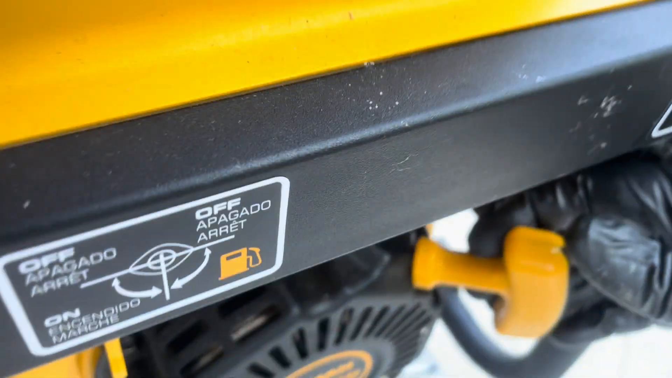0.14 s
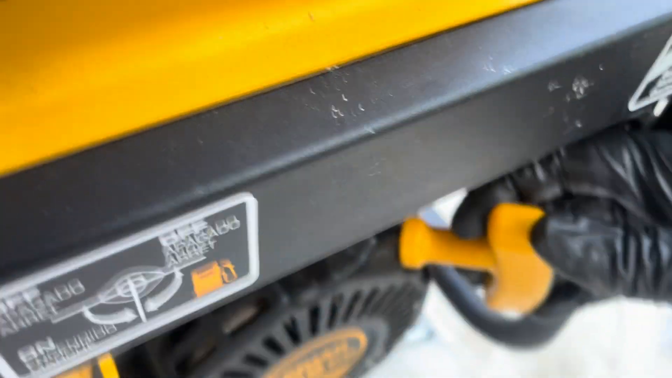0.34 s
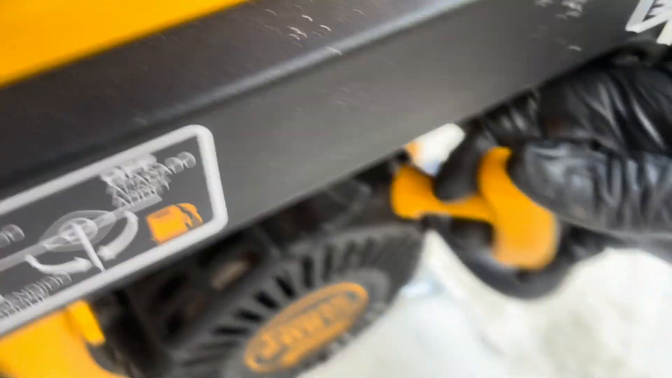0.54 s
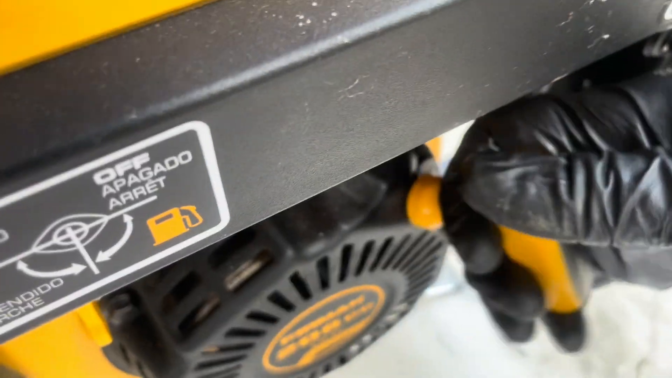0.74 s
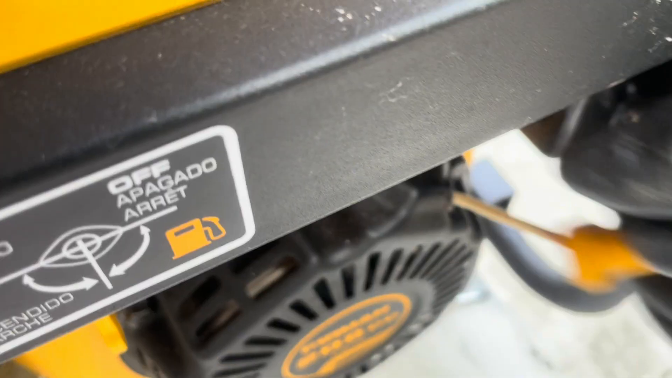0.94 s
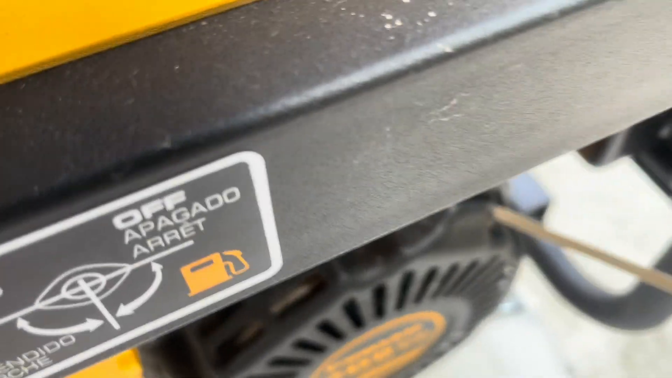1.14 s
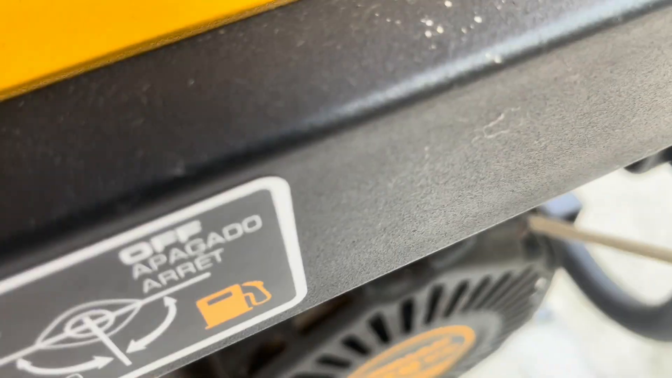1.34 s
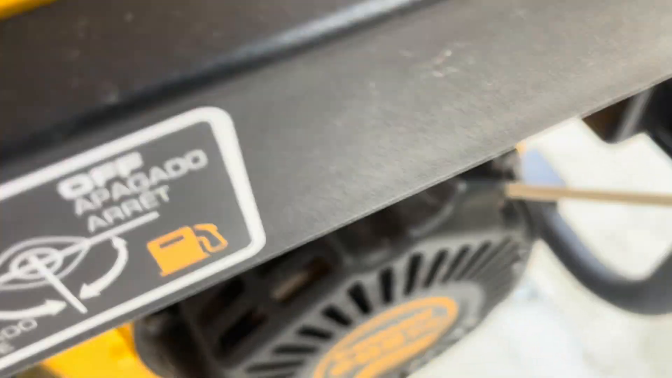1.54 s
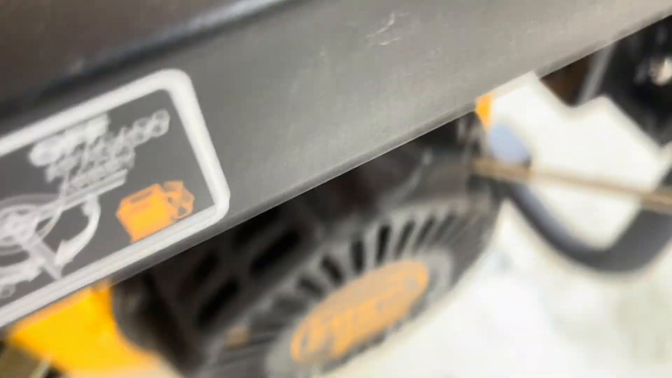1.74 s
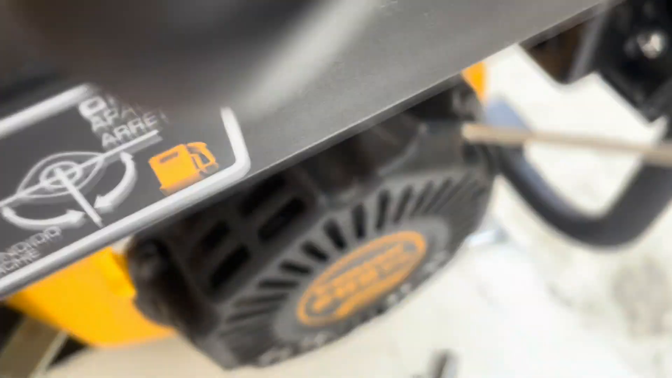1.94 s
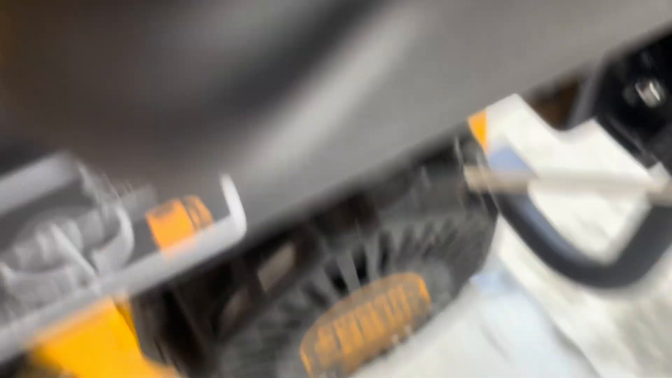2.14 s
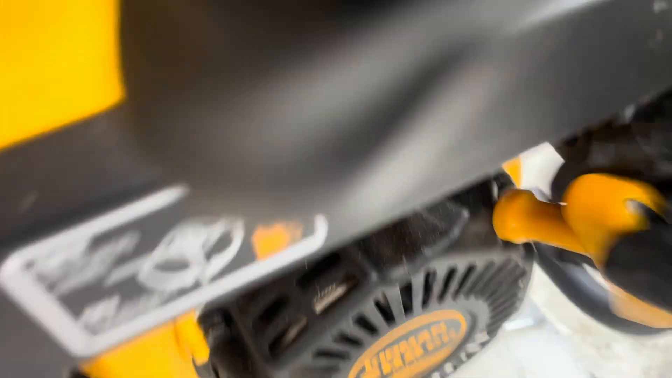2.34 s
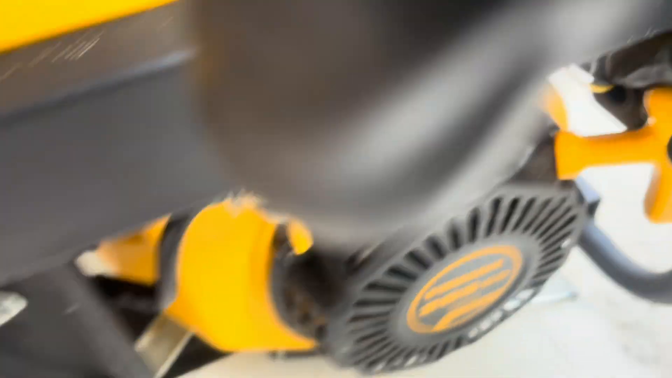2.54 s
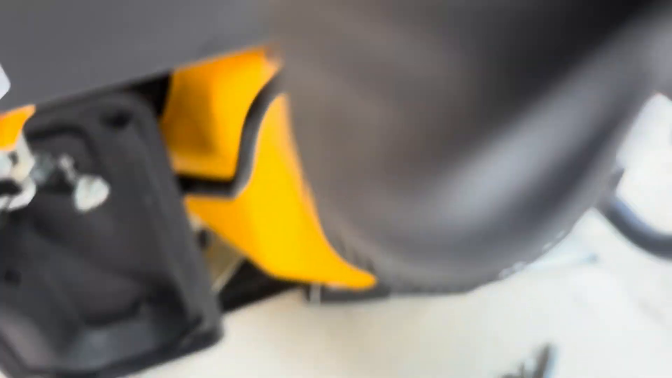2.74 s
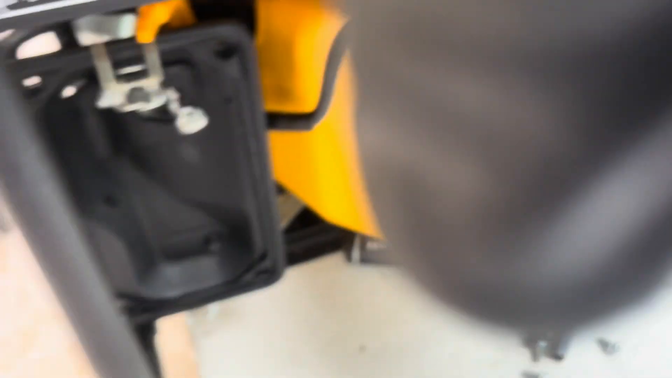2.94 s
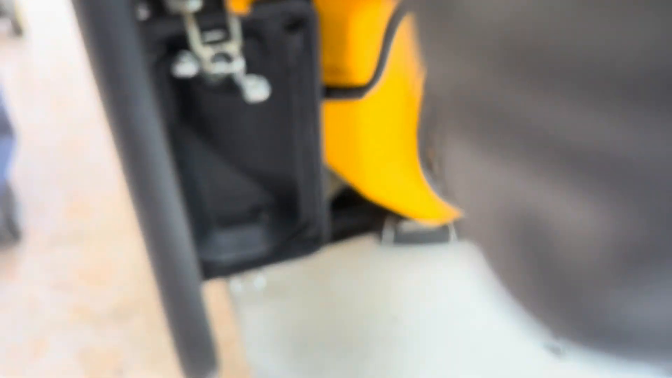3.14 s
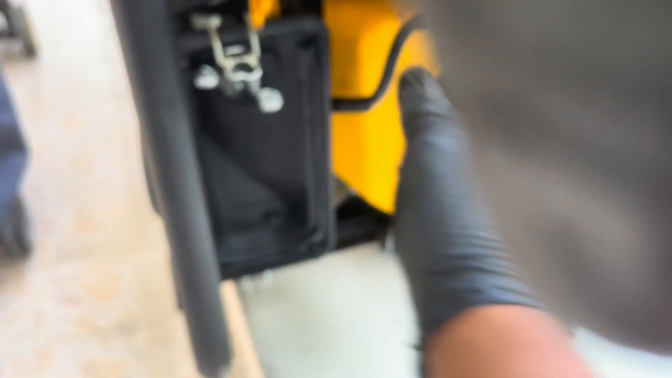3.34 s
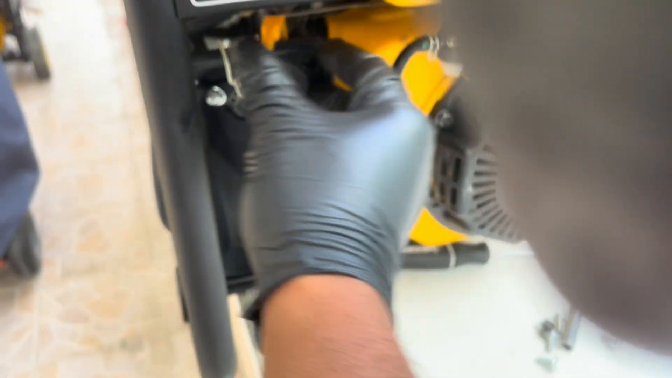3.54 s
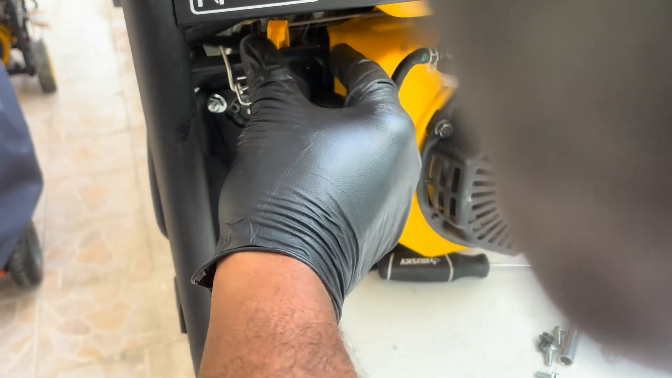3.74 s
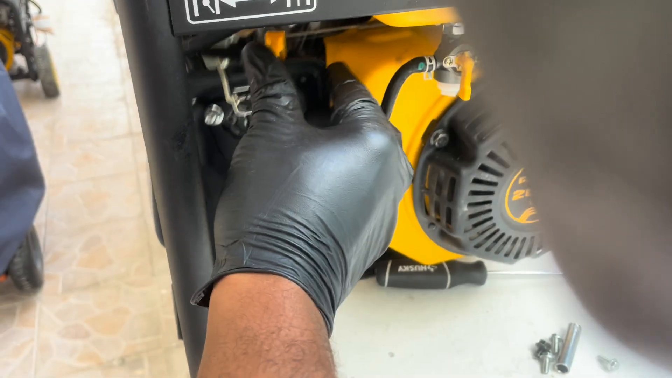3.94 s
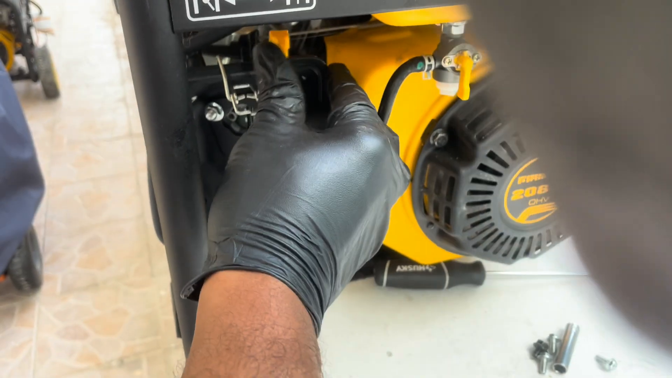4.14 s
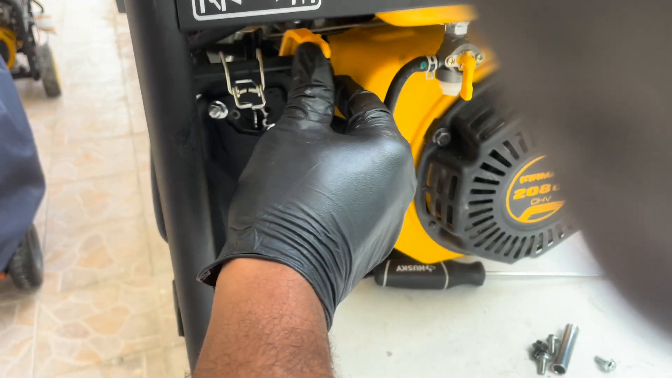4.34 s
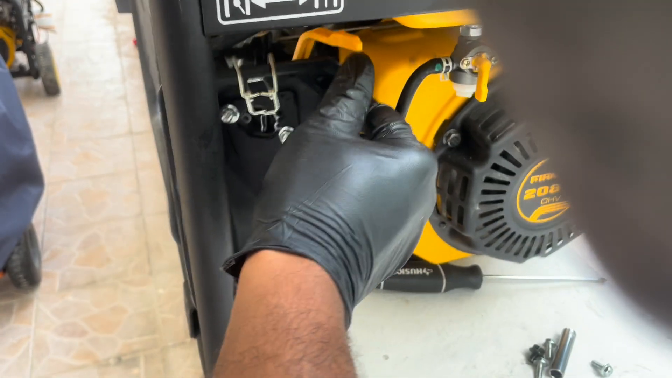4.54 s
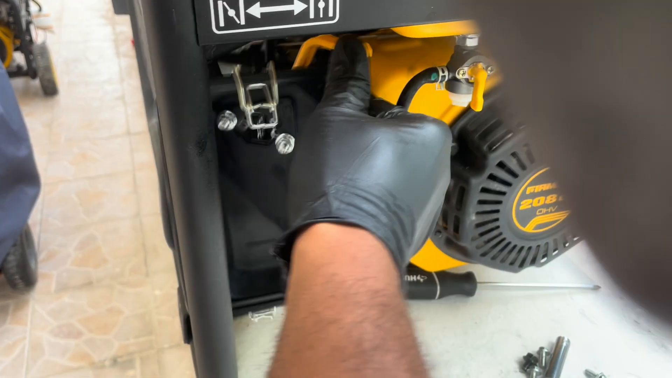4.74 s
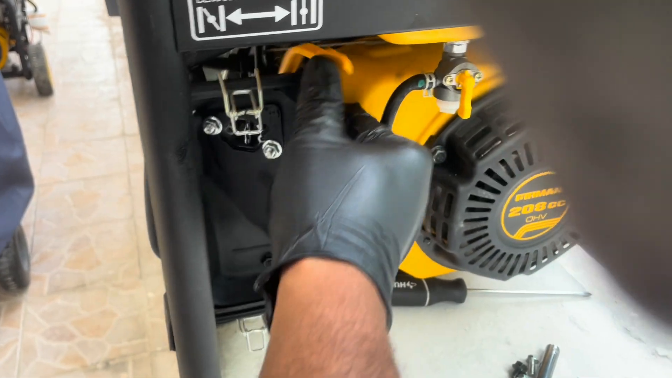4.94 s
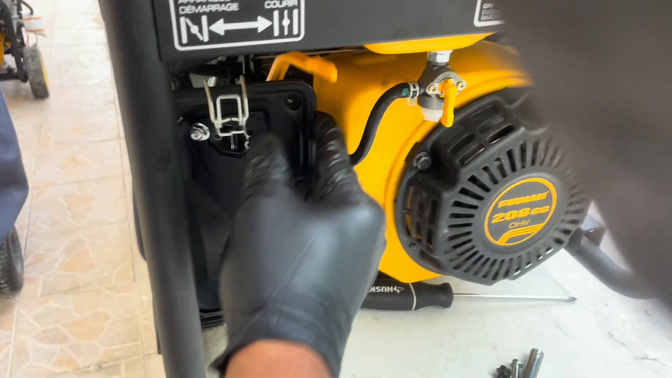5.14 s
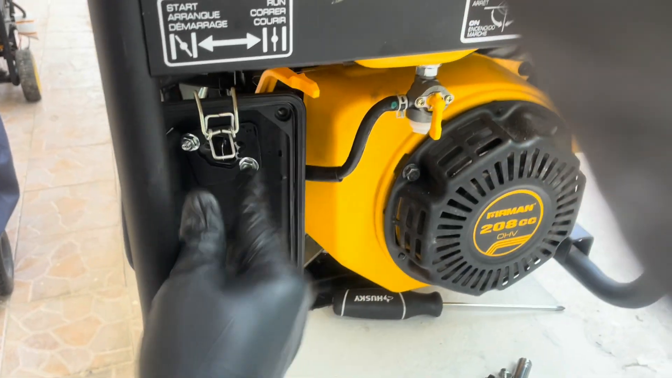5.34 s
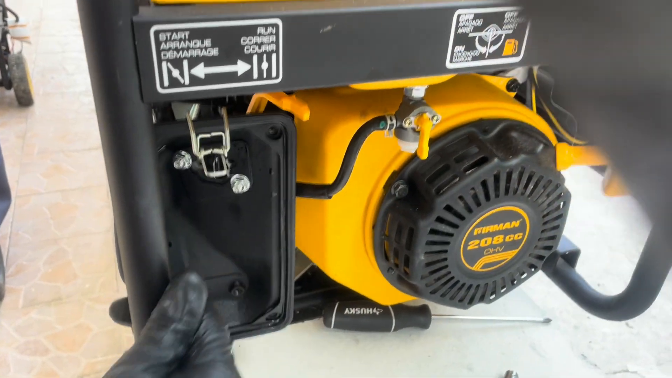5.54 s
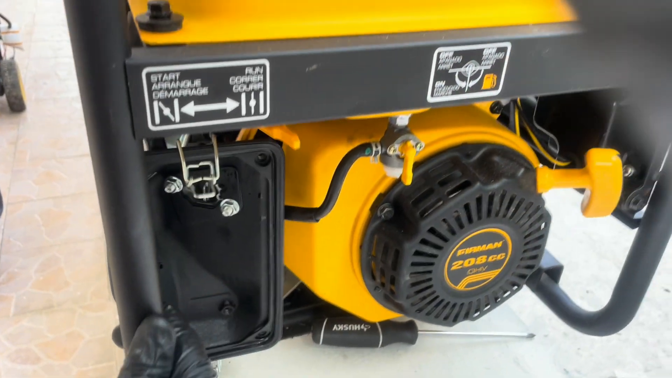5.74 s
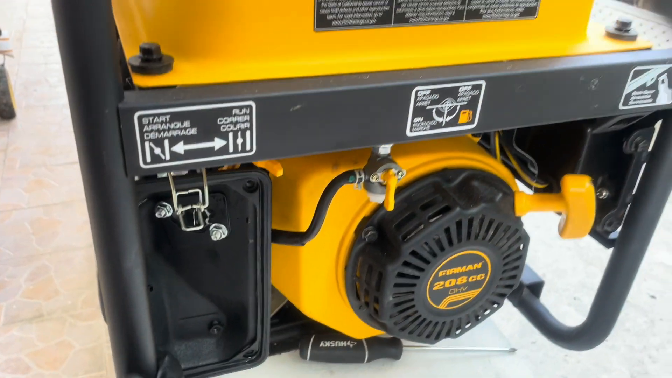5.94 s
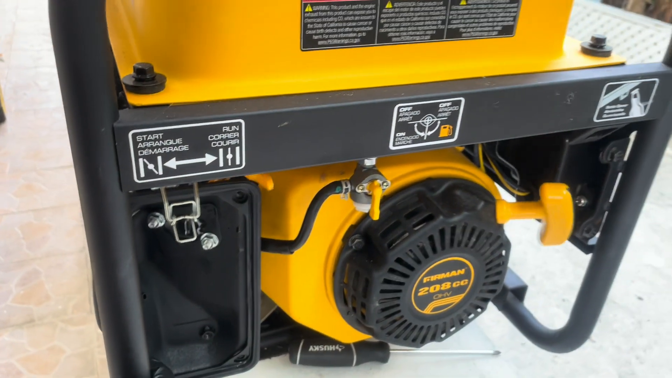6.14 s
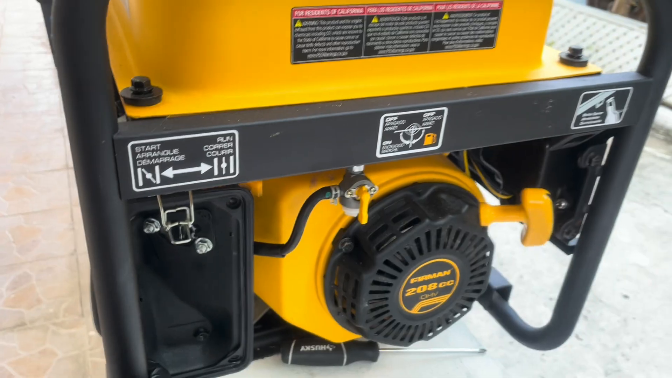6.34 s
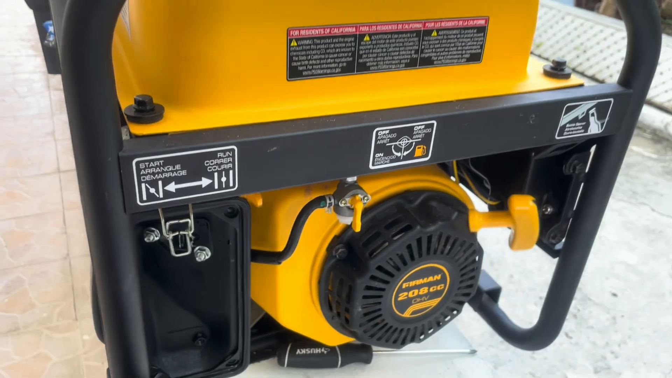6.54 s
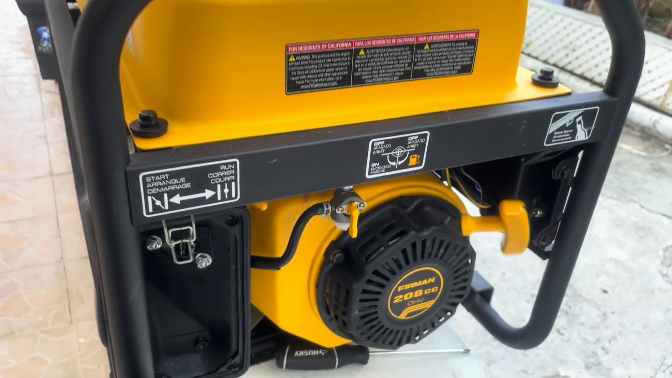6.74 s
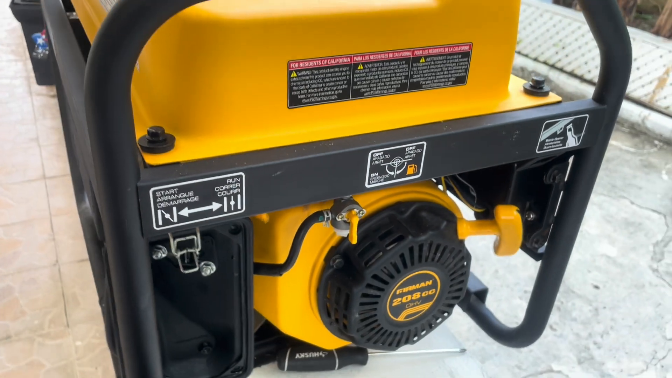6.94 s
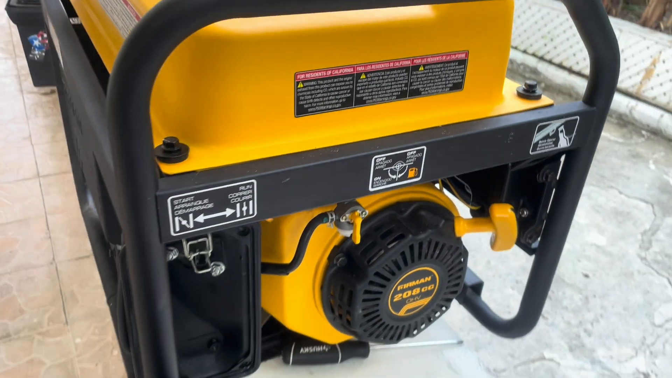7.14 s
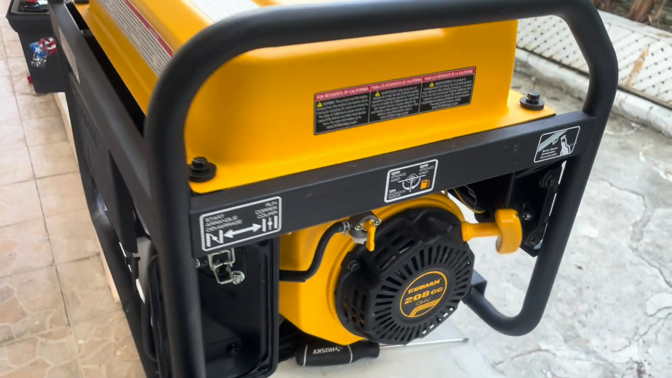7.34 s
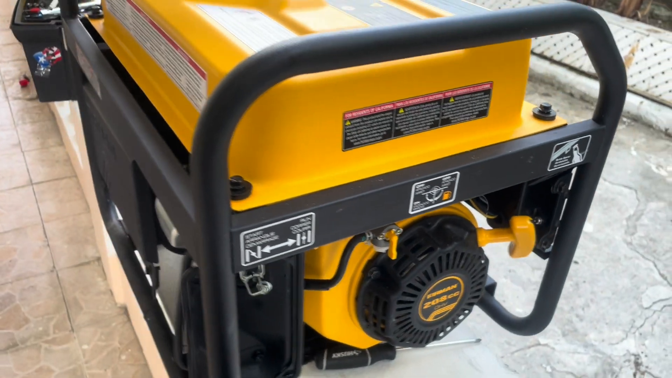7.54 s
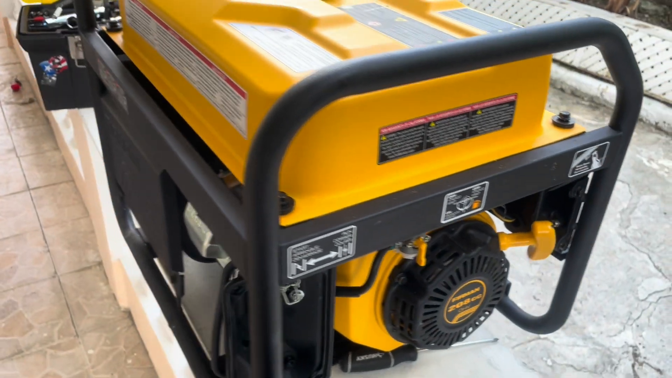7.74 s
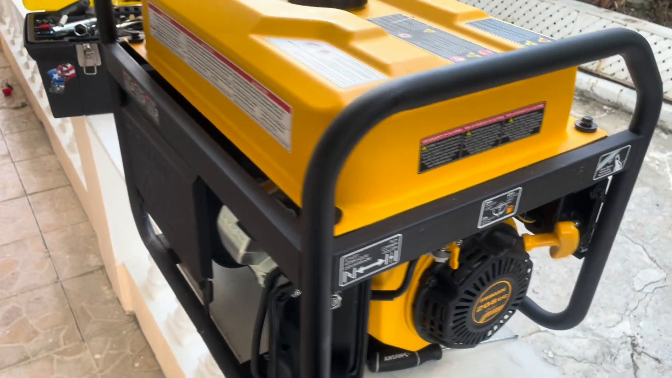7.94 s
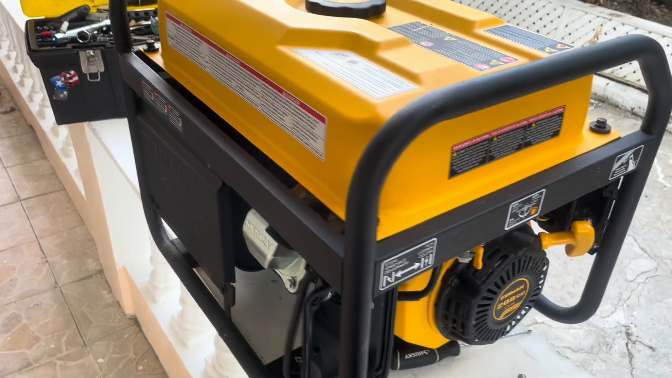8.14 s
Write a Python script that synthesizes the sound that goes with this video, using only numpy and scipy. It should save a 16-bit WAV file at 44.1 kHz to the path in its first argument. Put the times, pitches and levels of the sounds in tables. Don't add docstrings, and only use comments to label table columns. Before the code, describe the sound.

Handling bumps, ratchet clicks and a droning starter-cord pull, then a small generator engine chugs roughly, races up and settles into a steady drone.

```python
import sys
import numpy as np
from scipy import signal
from scipy.fft import rfft, irfft, next_fast_len
from scipy.io import wavfile
from scipy.ndimage import uniform_filter1d

SR = 44100
rng = np.random.default_rng(int(sys.argv[2]) if len(sys.argv) > 2 else 0)


def put_to_file(sound):
    columns = np.atleast_2d(sound).T
    safe = np.clip(columns, -1, 1)
    whole_steps = np.round(safe * 32767)
    wavfile.write(sys.argv[1], SR, whole_steps.astype(np.int16))


def amplitude_ratio(level_db):
    exponent = np.asarray(level_db, float) / 20
    return 10 ** exponent


N = 361179
TIME = np.arange(N) / SR
GOVERNED_S = .03179
GOVERNOR_S, TAKES_S = 4.7, 0.1


def unit(x):
    return x / np.sqrt(np.mean(x ** 2) + 1e-20)


def along(points, hz):
    f, v = np.transpose(points)
    return np.interp(np.log(hz + 1), np.log(f + 1), v)


def curves(rows, at=TIME):
    s, *cols = np.transpose(rows)
    return [np.interp(at, s, c) for c in cols]


def bell(x, centre, spread):
    return np.exp(-.5 * ((x - centre) / spread) ** 2)


def decay(t, db, t60):
    return amplitude_ratio(db - 60 * t / t60)


def strike(out, start_s, sound):
    out[round(start_s * SR):][:len(sound)] += sound


def wobble(rate):
    knots = int(N * rate / SR) + 2
    return np.interp(TIME * rate, np.arange(knots), rng.standard_normal(knots))


def filtered(x, response):
    m = next_fast_len(N + SR // 2)
    return irfft(rfft(x, m) * response(np.fft.rfftfreq(m, 1 / SR)), m)[..., :N]


def white():
    return rng.standard_normal(N)


def noise(spectrum):
    return unit(filtered(white(), lambda hz: amplitude_ratio(along(spectrum, hz))))


def resonant(x, modes):
    def response(f):
        total = 0
        for k, (c, w, db) in enumerate(modes):
            total = total + (-1) ** k * amplitude_ratio(db) * 1j * f * w / (c * c - f * f + 1j * f * w)
        return total
    return filtered(x, response)


def pulses(times, db):
    at = np.clip(np.round(times * SR).astype(int), 0, N - 1)
    return np.bincount(at, amplitude_ratio(db) * (times * SR < N - 1), N)


def held(db, turns):
    return amplitude_ratio(db[turns.astype(int)]) * (turns >= 0)


def governor(at):
    return np.clip((at - GOVERNOR_S) / TAKES_S, 0, 1)


# start_s, elapsed_cycles
CHOKED = [(1.379, 0), (1.636, 1), (1.835, 2), (2.145, 4), (2.412, 6), (2.65, 8), (2.864, 10), (3.066, 12),
          (3.165, 13), (3.272, 14), (3.506, 16), (3.622, 17), (3.747, 18), (3.998, 20), (4.233, 22)]
# start_s, delay_s
HUNT = [
    (4.86, 0),
    (5.06, .004),
    (6.1, .0015),
    (7.2, -.0005),
    (8.19, -.001),
]


def crank():
    first_excess_s, shrink = .0592, .676
    s, count = np.transpose(CHOKED)
    free = np.arange(1, int((N / SR - s[-1]) / GOVERNED_S) + 1)
    excess = first_excess_s * (1 - shrink ** free) / (1 - shrink)
    s = np.r_[s, s[-1] + GOVERNED_S * free + excess]
    count = np.r_[count, count[-1] + free]
    s = s + curves(HUNT, s)[0]
    return np.interp(TIME, s, count, left=-1), lambda turns: np.interp(turns, count, s)


# start_s, air_draw_db, choke_pop_db, open_throttle (0-1)
BREATH = [(1.379, -44.5, -17, 0.26), (1.636, -38.5, 1.5, 0.53), (1.835, -40, -13, 0.44),
          (1.989, -30.5, -0.5, 0.07), (2.145, -27.5, -1.5, 0.17), (2.279, -29, 0.5, 0.17),
          (2.412, -27, -3, 0), (2.65, -24, -3.5, 0.09), (2.864, -23.5, -4, 0), (3.07, -23.5, -6, 0.05),
          (3.272, -28, -9, 0.1), (3.39, -29, -15, 0.11), (3.5, -30.5, -10, 0.02), (3.626, -30, -8.5, 0),
          (3.87, -29.5, -7.5, 0), (4.115, -26.5, -9.5, 0.14), (4.233, -22.5, -6.5, 0.24),
          (4.36, -21, 3, 0.37), (4.51, -20, -25, 0.37), (4.66, -23, -38, 0.75), (4.72, -28, -23, 0.54),
          (4.765, -28.5, -21, 0.97), (4.83, -35.5, -24, 0.47), (5.2, -39, -66, 0.77), (8.19, -72, -38, 0.6)]
# start_s, level_db
AWAY = [
    (4.8, -3),
    (5.5, -2.5),
    (6.5, -3.5),
    (7.2, -4.5),
    (8.19, -5.5),
]


def strengths(cycle, at):
    draw_db, pop_db, throttle = curves(BREATH, at)
    away_db, = curves(AWAY, at)
    draw_db = draw_db + away_db
    misfire = (cycle % 2 == 1) & (cycle > CHOKED[2][1]) & (cycle < CHOKED[-1][1])
    miss_db = -2 * misfire
    thump_db = draw_db + 6.5 + 10 * throttle - 17 * governor(at) + miss_db
    looser_db = -2.5 * (at < CHOKED[-1][0])
    clatter_db = -18.5 + looser_db + 0.43 * (draw_db + 28.5)
    return pop_db + away_db + miss_db, thump_db, draw_db, clatter_db, draw_db - 18


def with_speed(turns):
    tone_db_per_octave, fan_db_per_octave, fan_full_hz = 16, 12, 13.14
    rate = uniform_filter1d(np.gradient(turns.clip(0)) * SR, size=4000) + 1e-3
    away_db, = curves(AWAY)
    rise_db = tone_db_per_octave * np.log2(rate * GOVERNED_S)
    tone_db = -28 + rise_db
    crack_db = 1 + 1.4 * away_db + rise_db - 13 * (1 - governor(TIME))
    crack_db = crack_db + 5 * np.exp(-np.abs(TIME - GOVERNOR_S - TAKES_S) / .35)
    fan_db = -22 + away_db + fan_db_per_octave * np.log2(np.minimum(rate / fan_full_hz, 1))
    fan_db = fan_db - 11.5 * (TIME < CHOKED[-1][0]) * bell(turns % 2, 0.88, 0.13)
    return tone_db, crack_db, fan_db, curves(BREATH)[2]


def engine():
    turns, time_of = crank()
    cycle, share = np.arange(int(turns[-1]) + 1), turns % 1
    pop_db, thump_db, hiss_db, clatter_db, puff_db = strengths(cycle, time_of(cycle))
    tone_db, crack_db, fan_db, throttle = with_speed(turns)
    luck = rng.standard_normal((len(cycle), 8)).T
    shut = time_of(cycle + .31 + 0.0077 * luck[0])
    stroke = np.clip(share / 0.075, 0, 1) * np.clip((.33 - share) / 0.067, 0, 1) + 0.01

    pop = intake_pop(cycle, time_of, shut, pop_db, luck)
    thump = intake_thump(cycle, time_of, shut, thump_db, throttle, luck)
    air = intake_hiss(turns, stroke, hiss_db, puff_db, throttle)
    clatter = valve_clatter(cycle, turns, time_of, clatter_db, throttle, luck)
    rocking = uniform_filter1d(held(thump_db - 11.5, turns), 2000) * noise(RUMBLE)
    firing = -amplitude_ratio(tone_db) * exhaust_tone(turns)
    firing = firing - amplitude_ratio(crack_db) * firing_crack(cycle, time_of, luck)
    firing = firing + amplitude_ratio(fan_db) * cooling_fan(share)
    bark = muffler_bark(cycle, time_of, luck)
    return pop + thump - bark + air + clatter + rocking + (turns >= 2) * firing


# centre_hz, width_hz, level_db
AIR_BOX = [(732, 65, 2), (900, 200, -13)]


def intake_pop(cycle, time_of, shut, pop_db, luck):
    suck = pulses(time_of(cycle), pop_db + 38 + 2.5 * luck[4])
    suck = suck + pulses(shut, pop_db + 27 + 3 * luck[1])
    duct = resonant(suck, [(700, 200, 0.38)])
    return resonant(duct, AIR_BOX)


# frequency_hz, level_db
THUMP = [(30, -34), (60, 0.5), (110, 5), (250, 1), (450, -17), (800, -6), (2000, -61)]
# centre_hz, width_hz, level_db
THROAT = [(66, 30, -18), (163, 80, -2), (325, 100, -2), (525, 22, 5)]


def intake_thump(cycle, time_of, shut, thump_db, throttle, luck):
    push = pulses(time_of(cycle + 0.011), thump_db + 44.5 + 1.64 * luck[2])
    push = push + pulses(shut, thump_db + 46.5 + 2 * luck[3])
    rebound = pulses(time_of(cycle + .46), thump_db + 40 + 2 * luck[1])
    dull = (1 - throttle.clip(0, 1)) * filtered(push, lambda hz: amplitude_ratio(along(THUMP, hz)))
    return dull + amplitude_ratio(4.0) * resonant(throttle * (push + 1.3 * throttle * rebound), THROAT)


# frequency_hz, level_db
INTAKE = [(500, 7.5), (1500, 8), (3000, 0.5), (5000, -6.5), (6500, -3), (8000, 8.5), (10000, 4.5),
          (13000, -3), (16000, 1)]
# centre_hz, width_hz, level_db
GULP = [(1210, 88, 0), (2330, 260, 4.5), (3600, 3500, -8.5)]
# start_s, level_db
PUFFS = [(2.106, -26), (2.239, -43), (2.38, -25.5), (2.5, -33), (2.62, -23), (2.73, -40), (2.843, -24),
         (3.048, -25), (3.484, -26), (3.722, -33), (3.967, -26), (4.204, -25)]


def intake_hiss(turns, stroke, hiss_db, puff_db, throttle):
    rush = held(hiss_db + 6.5, turns) * amplitude_ratio(throttle) * stroke
    late_puff = held(puff_db + 9.0, turns) * bell(turns % 1, 0.86, 0.048)
    blown_back = sum(amplitude_ratio(db) * bell(TIME, s, 0.0056) for s, db in PUFFS)
    hiss = (rush + late_puff + blown_back) * noise(INTAKE)
    gulp = held(hiss_db + 11.5, turns) * throttle * stroke * unit(resonant(white(), GULP))
    return hiss + gulp


# place (share of the cycle), spread (share of the cycle), level_db
VALVES = [
    (.04, 0.058, -3),
    (.29, 0.034, -5.5),
    (.47, 0.065, -6.5),
    (.58, .07, -12),
    (.76, 0.076, -6.5),
]
# centre_hz, width_hz, level_db
CASING = [(560, 400, -4), (950, 153, 1.5), (1431, 93, 2.5), (1560, 120, -4), (5400, 97, -31.5),
          (2122, 92, -3), (2493, 78, -8), (3680, 1040, -18), (4630, 1300, -44)]
# frequency_hz, level_db
SEAT = [(400, -14), (1600, -3), (4000, -4.5), (6500, -4), (9500, 0), (13000, -19), (16000, -16)]


def valve_clatter(cycle, turns, time_of, clatter_db, throttle, luck):
    share, at_cycle = turns % 1, turns.astype(int)
    knocks, ticks = .17 + .5 * throttle, 0
    for k, (c, w, db) in enumerate(VALVES):
        knocks = knocks + amplitude_ratio(db + 3 * luck[3 + k][at_cycle]) * bell(share, c, w)
        ticks = ticks + pulses(time_of(cycle + c + w * luck[7 - k]), db + 23.5 + 4 * luck[k])
    grit = white() * amplitude_ratio(4 * (0.5 - throttle) * wobble(500))
    cover = resonant(knocks * grit * amplitude_ratio(5 * wobble(30)) + ticks, CASING[::2])
    block = resonant(knocks * grit * amplitude_ratio(5 * wobble(30)) - ticks, CASING[1::2])
    level = uniform_filter1d(held(clatter_db, turns), 800)
    clatter = level * unit(cover - block) * (1 - 1.33 * throttle.clip(0, 1))
    lift = np.clip((share - .44) / 0.035, 0, 1) * np.exp(-(share - .44) / 0.037)
    seat = held(clatter_db + 0.5 + 2 * luck[5], turns) * lift
    return clatter + seat * (1 - throttle.clip(0, 1)) * noise(SEAT)


# multiple (of the cycle rate), level_db, change_db_per_s (as the phone moves round)
EXHAUST = [(2, 0, -1), (3, -9, 0), (4, -9, -2), (5, -4, -1.5), (6, -11, -2), (7, -4, -1), (8, -12, -2),
           (9, -6, -1.5), (10, -8, -2), (11, -11, -2), (12, -2.5, -1), (13, -14, -2), (16, -5.5, -5),
           (17, -13, -3), (18, -11, -3.5), (20, -8, -1.5), (23, -6, -2), (25, -8, -2), (27, -9, -2)]


def exhaust_tone(turns):
    tone = 0
    for k, db, slope_db in EXHAUST:
        level_db = db + slope_db * (TIME.clip(GOVERNOR_S) - 6.3) + 3.0 * wobble(5.4)
        phase = k * 2 * np.pi * turns + .35 * k * k + .6 * wobble(11.0)
        tone = tone + amplitude_ratio(level_db) * np.cos(phase)
    return unit(tone)


# centre_hz, width_hz, level_db
HEAD = [(420, 250, -8), (900, 550, 0), (1500, 400, -5), (2400, 800, -10)]


def firing_crack(cycle, time_of, luck):
    blows = pulses(time_of(cycle - .03 + .003 * luck[0]), 22 + 1.5 * luck[7])
    blows = blows + pulses(time_of(cycle + .47), 10 + 3 * luck[6])
    return filtered(resonant(blows, HEAD), lambda hz: 1 / (1 + 1j * hz / 3200) ** 2)


# frequency_hz, level_db
FAN = [(40, -31.5), (100, -28), (350, -5.5), (450, -10), (800, -7.5), (1500, -2.5), (1800, -11),
       (2300, -9.5), (4000, -17), (5200, -20), (5700, -19.5), (6300, -24.5), (7000, -20), (9300, -19),
       (12000, -29.5), (16000, -28.5)]


def cooling_fan(share):
    pulse_db = 1.4 * np.cos(4 * np.pi * (share - .05))
    return noise(FAN) * amplitude_ratio(pulse_db + .5 * wobble(12) + .6 * wobble(400))


# centre_hz, width_hz, level_db
BARK = [(152, 100, 5), (296, 180, 1), (514, 160, -16)]


def muffler_bark(cycle, time_of, luck):
    at = time_of(cycle - .03)
    bark_db = 28 - 20 * (at - GOVERNOR_S) / 0.41 + 0.5 * (-1) ** cycle + 1.3 * luck[7]
    return resonant(pulses(at, bark_db * 1.0) * governor(TIME), BARK)


# start_s, peak_db, panel_hz, t60_s
RATTLES = [(2.029, -16, 1550, 0.051), (2.068, -14.5, 940, 0.028), (2.084, -25, 1380, 0.054),
           (2.174, -18, 1420, 0.062), (2.202, -10, 1393, 0.073), (2.241, -26, 970, 0.043),
           (2.314, -28, 1390, 0.048), (2.346, -7.5, 907, 0.099), (2.357, -9, 872, 0.19),
           (2.442, -15, 1443, 0.1), (2.468, -15, 1420, 0.086), (2.564, -23, 1410, 0.056),
           (2.59, -12, 1470, 0.085), (2.604, -8, 1400, 0.15), (2.702, -9, 1420, 0.063),
           (2.79, -9, 1390, 0.064), (2.81, -16, 1240, 0.07), (2.889, -10, 1270, 0.06),
           (2.912, -10, 960, 0.19), (3.013, -7.5, 950, 0.061), (3.098, -12, 1243, 0.09),
           (3.112, -12, 1400, 0.048), (3.192, -19, 1413, 0.093), (3.215, -12, 1440, 0.076),
           (3.303, -14, 1434, 0.11), (3.325, -15, 1396, 0.07), (3.422, -20, 1380, 0.083),
           (3.442, -15, 1440, 0.048), (3.511, -11.5, 970, 0.31), (3.554, -11, 1380, 0.077),
           (3.66, -15, 1510, 0.076), (3.678, -15, 1420, 0.07), (3.799, -8.5, 1460, 0.071),
           (3.903, -15, 1475, 0.078), (3.933, -15, 1420, 0.083), (4.027, -10, 1390, 0.082),
           (4.047, -11, 1410, 0.09), (4.152, -11.5, 1500, 0.058), (4.175, -10, 1475, 0.08),
           (4.278, -5.5, 1420, 0.056)]
# centre_hz, width_hz, level_db
SHROUD = [(1800, 180, 1), (2260, 97, 2.5), (2560, 200, 4), (3110, 400, 1), (4010, 300, -1), (5070, 210, -3)]


def panels():
    ring, buzz, t = np.zeros(N + SR), np.zeros(N + SR), np.arange(SR // 5) / SR
    for s, db, hz, t60 in RATTLES:
        shape = decay(t, db, np.clip(t60, .02, .25)) * (1 - np.exp(-t / 0.0019))
        wander = .04 * np.cumsum(rng.standard_normal(len(t)))
        strike(ring, s, shape * np.sin(2 * np.pi * hz * t + wander))
        strike(buzz, s, decay(t, db, 0.024) * (1 - np.exp(-t / 0.00063)))
    return amplitude_ratio(-6) * ring[:N] + amplitude_ratio(-9.5) * unit(resonant(white(), SHROUD)) * buzz[:N]


def starter():
    return ratchet() + rope()


# frequency_hz, level_db
TOOTH = [(400, -16), (800, -6), (1600, -18.5), (4000, -10), (6500, -0.5), (9500, 4), (13000, -7.5),
         (16000, -15)]
# centre_hz, width_hz, level_db
TEETH = [(660, 57, 1), (853, 14, -10), (1490, 140, 0), (2340, 240, -7), (3050, 170, -1.5), (3840, 79, 4),
         (4360, 210, 1.5), (5830, 1500, -9)]


def hub():
    return unit(amplitude_ratio(-4) * noise(TOOTH) + amplitude_ratio(-2) * unit(resonant(white(), TEETH)))


# start_s, peak_db, rattle_t60_s, ring_db
RATCHET = [(0.7346, -41, 0.033, -11), (0.892, -21, 0.053, -18), (0.8966, -23, 0.037, -30),
           (0.9356, -15, 0.064, -29), (0.946, -17, 0.053, -9), (1.003, -7.5, 0.029, -15),
           (1.046, -6, 0.036, -22), (1.0548, -0.5, 0.027, -26), (1.06, -9, 0.016, -12.5),
           (1.0794, -49, 0.05, -4), (1.281, -23.5, 0.073, -12), (1.347, -33, 0.038, 7),
           (1.487, -35, 0.017, -7), (1.6162, -30, 0.05, -2), (1.689, -12, 0.022, -10),
           (1.7187, -9, 0.049, -9), (1.723, -10, 0.11, -33), (3.874, -28, 0.037, -12),
           (4.366, -6, 0.055, -6), (4.395, -15.5, 0.055, -6)]
# frequency_hz, level_db, t60_s
PAWL = [(844, 2.5, 0.63), (1193, 17, 0.023), (1613, 14.5, 0.046), (2320, 6, 0.067), (3300, -20, 0.039),
        (3690, -9, 0.07), (4370, 1, 0.027), (4716, -38, 5.0), (5873, -53, 0.084), (8300, 21.5, 0.0097)]
# frequency_hz, level_db, t60_s
CUP = [(1798, -11, .5), (2638, -7, .5), (4780, -5.5, 1.0), (7176, 4, .3), (8812, -8, .5)]
# start_s, peak_db
CATCHES = [
    (1.278, -26),
    (1.3457, -20),
    (1.4185, -27),
    (1.441, -23),
    (1.5467, -13),
    (1.6146, -24),
    (1.6415, -4),
    (1.6904, -15),
    (1.7178, -19),
]


def ratchet():
    ring, rattle, t = np.zeros(N + SR), np.zeros(N + SR), np.arange(SR // 2) / SR
    for s, db, t60, ring_db in RATCHET:
        strike(rattle, s, decay(t, db - 5.5, max(t60, .005)) * (1 - np.exp(-t / 0.00099)))
        modes = 0
        for hz, level, life in PAWL:
            modes = modes + decay(t, level + rng.normal(0, 1.85), min(life, .35)) * np.sin(2 * np.pi * hz * t)
        strike(ring, s, amplitude_ratio(db - 13.5 + ring_db) * modes)
    for s, db in CATCHES:
        strike(rattle, s, decay(t, db - 11, 0.027) * (1 - np.exp(-t / .001)))
    cup = 0
    for hz, level, life in CUP:
        beat = 1 + .7 * np.cos(2 * np.pi * rng.uniform(24.6, 70) * t)
        broken_db = 3.2 * wobble(54)[:len(t)]
        cup = cup + decay(t, level + broken_db, life) * beat * np.sin(2 * np.pi * hz * t)
    strike(ring, 1.722, amplitude_ratio(-34) * cup)
    spring = decay(t, -28 + 2 * wobble(40)[:len(t)], 0.49) * np.sin(2 * np.pi * 860 * t)
    strike(ring, 1.058, spring)
    return ring[:N] + rattle[:N] * hub()


# start_s, effort_db
ROPE = [
    [(0.88, -72), (0.892, -46), (1.016, -19), (1.03, -49), (1.056, -17.5), (1.142, -48), (1.26, -35)],
    [(1.296, -21), (1.396, -26.5), (1.478, -17.5), (1.544, -28), (1.634, -15), (1.7, -23.5), (1.716, -10),
     (1.77, -39), (2.05, -64)],
]
# centre_hz, width_hz, level_db
SPOOL = [(663, 133, -6), (875, 24, -19), (970, 120, -6), (1520, 1460, -14.5)]


def rope():
    pull_s, slack_hz, pull_hz, sag_hz_per_s = 1.2, 872, 1022, 690
    drone_db, = curves([(.86, -90)] + list(ROPE[0]) + list(ROPE[1]))
    pulled = np.clip((TIME - pull_s) / 0.0655, 0, 1)
    grain = amplitude_ratio(2.9 * wobble(150))
    drone = amplitude_ratio(drone_db - 5.5) * unit(resonant(grain * white(), SPOOL))
    whine_hz = slack_hz + pulled * (pull_hz - slack_hz - sag_hz_per_s * (TIME.clip(0, 2) - pull_s))
    whine = amplitude_ratio(drone_db - 7.0) * wobble(160) * np.sin(2 * np.pi * np.cumsum(whine_hz) / SR)
    scrape_db = drone_db - 10 - 1.5 * pulled
    scrape = amplitude_ratio(scrape_db - 1.5) * unit(grain * hub())
    rub = amplitude_ratio(-33) * bell(TIME, 1.675, .013)
    squeal = rub * unit(resonant(white(), [(5150, 160, 0)]))
    return drone + whine + scrape + squeal


# start_s, peak_db
NUDGES = [(0.026, -36.5), (0.066, -37), (0.131, -41), (0.182, -38), (0.237, -36), (0.253, -30.5),
          (0.304, -23), (0.359, -38), (0.411, -34), (0.434, -35), (0.48, -41), (0.619, -42), (1.195, -38)]
# start_s, level_db, pitch_hz
TAPS = [
    (.229, -50, 3200),
    (.243, -58, 11500),
    (.254, -46, 900),
    (.41, -62, 9500),
]


def nudges():
    nudge_hz, swing_hz = 314, 139
    out, t = np.zeros(N + SR), np.arange(SR // 10) / SR
    push = lambda u: u * u * (3 - u) * np.exp(-u) / 2
    for s, db in NUDGES:
        swing_db = 2 + 0.7 * (db + 21)
        motion = push(t * nudge_hz * 5) + amplitude_ratio(swing_db) * push(t * swing_hz * 5)
        strike(out, s, amplitude_ratio(db + 11.5) * motion)
    for s, db, hz in TAPS:
        rough = .3 * np.cumsum(rng.standard_normal(len(t)))
        strike(out, s, decay(t, db, .02) * np.sin(2 * np.pi * hz * t + rough))
    return out[:N]


# start_s, rumble_db, fall_db_per_s
GRIP = [
    (.09, -34, 150),
    (.34, -33, 140),
    (1.03, -33, 368),
    (1.2, -34, 225),
    (1.49, -22.5, 71),
    (1.83, -44, 73),
    (1.99, -30, 90),
]
# frequency_hz, level_db
RUMBLE = [(20, -35), (45, 1.5), (80, 5), (150, 3.5), (300, -8.5), (800, -67)]


def hand_rumble():
    rises = []
    for s, db, fall in GRIP:
        rises.append(db - np.maximum(250 * (s - TIME), fall * (TIME - s)))
    grip_db = np.maximum(np.max(rises, axis=0), -50.5)
    return amplitude_ratio(grip_db - 8.5 + 2.5 * wobble(25)) * noise(RUMBLE)


# frequency_hz, level_db
YARD = [(25, -18), (60, -6), (180, -0.5), (400, -6), (960, -8), (1300, -12), (2200, -16.5), (4000, -24.5),
        (8000, -32), (16000, -41)]
# start_s, level_db
MURMUR = [
    (0, -49.5),
    (.8, -51),
    (.9, -46.5),
]
# centre_s, spread_s, level_db
RUSTLES = [
    (.61, 0.045, -59),
    (.8, 0.054, -65),
]
# centre_hz, width_hz, level_db
FAR_HUM = [(950, 36, -65)]


def yard():
    murmur_db = curves(MURMUR)[0] + 8 * bell(TIME, 0.74, 0.009)
    murmur = amplitude_ratio(murmur_db + .6 * wobble(13.0)) * noise(YARD)
    rustle = amplitude_ratio(-83) + sum(amplitude_ratio(db) * bell(TIME, s, spread) for s, spread, db in RUSTLES)
    glove = rustle * amplitude_ratio(3.5 * wobble(89.4)) * noise(INTAKE)
    hum = amplitude_ratio(3.1 * wobble(7.8)) * unit(resonant(white(), FAR_HUM)) * amplitude_ratio(FAR_HUM[0][2])
    return murmur + glove + hum + hand_rumble()


def walls(x, t60):
    t = np.arange(SR // 4) / SR
    tail = rng.standard_normal(len(t)) * decay(t, 0, t60) * (1 - np.exp(-t / 0.0069))
    return signal.fftconvolve(x, tail / np.linalg.norm(tail))[:N]


# frequency_hz, level_db
DIFFUSE = [(60, -22), (200, -15), (500, -20), (1000, -10), (2000, -8), (4500, -4), (5500, -8), (6200, -18),
           (7500, -20), (22050, -21)]


def scene():
    near = engine() + panels() + starter() + yard()
    scattered = filtered(walls(near, t60=0.074), lambda hz: hz * hz / (hz * hz + 450 ** 2))
    near = near + amplitude_ratio(-10.0) * scattered + nudges()
    apart = filtered(walls(near, t60=0.068), lambda hz: amplitude_ratio(along(DIFFUSE, hz)))
    return np.array([near + apart, near - apart])


def pruned(x, under_db):
    hz, _, z = signal.stft([x[0] + x[1], x[0] - x[1]], SR, nperseg=1024)
    power = np.abs(z[:, :512]) ** 2
    bands = power.reshape(2, 64, 8, -1).sum(axis=2)
    total = power[:, 100:].sum(axis=(0, 1))
    attack = total > 13 * np.roll(total, 2)
    weak = (bands < bands[::-1] * amplitude_ratio(-2 * under_db)) & ~attack
    z[:, :512] *= 1 - np.repeat(weak, 8, axis=1) * (hz[:512, None] > 5600)
    mid, side = signal.istft(z, SR, nperseg=1024)[1][:, :N] / 2
    return np.array([mid + side, mid - side])


# frequency_hz, left_lead_rad
PORTS = [(0, 0), (600, .3), (1100, -.1), (1700, -.5), (2000, .2), (3300, .4), (5600, .1), (6300, -.2),
         (7600, -2.45), (8850, -3.8), (10500, -5.6), (12900, -6.95), (13600, -8.75), (16000, -9.8)]
# frequency_hz, left_minus_right_db
TILT = [(60, .8), (140, 2), (330, 2), (500, 1.5), (770, 4.6), (1200, 3.5), (2700, 3.3), (4200, 2.2),
        (6400, .5), (7300, 0), (22050, 0)]


def microphones(x):
    hz_of, lead = np.transpose(PORTS)
    sides = np.array([[.5], [-.5]])

    def response(hz):
        ports = amplitude_ratio(sides * along(TILT, hz)) * np.exp(1j * sides * np.interp(hz, hz_of, lead))
        late = np.exp(2j * 6.1 * np.arctan2(95, hz))
        return ports * late
    return filtered(x, response)


def roll_off(x):
    return signal.sosfilt(signal.butter(12, 15940, fs=SR, output="sos"), x)


def record(dry):
    x = microphones(dry)
    x = x / (1 + np.abs(x / .93) ** 4) ** (1 / 4)
    mix = filtered(pruned(x, under_db=6.5), lambda hz: hz < 15900)
    return roll_off(mix)


dry = scene()
out = record(dry)
put_to_file(out)
```